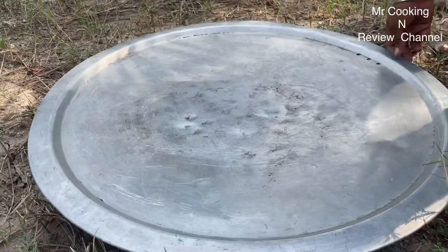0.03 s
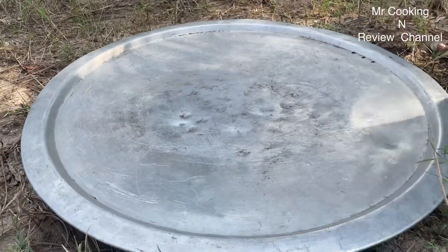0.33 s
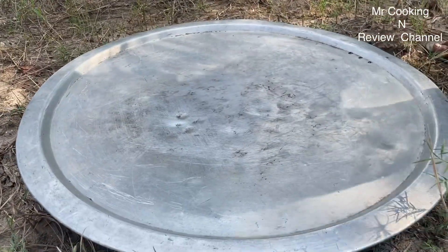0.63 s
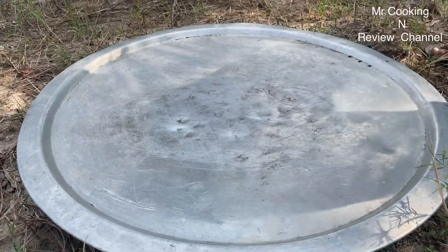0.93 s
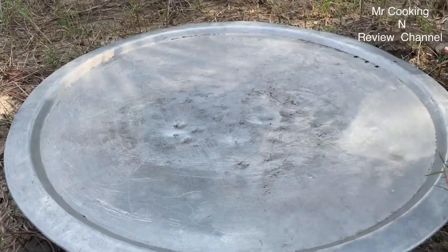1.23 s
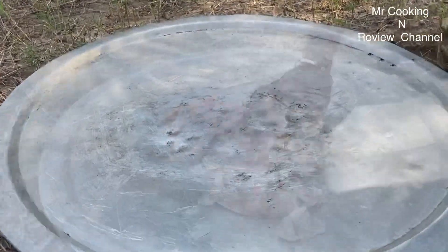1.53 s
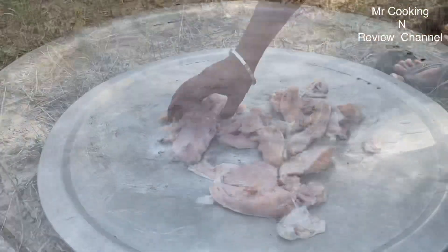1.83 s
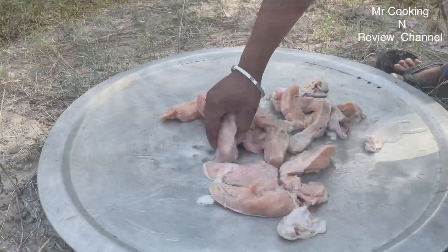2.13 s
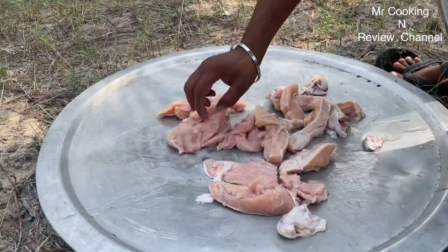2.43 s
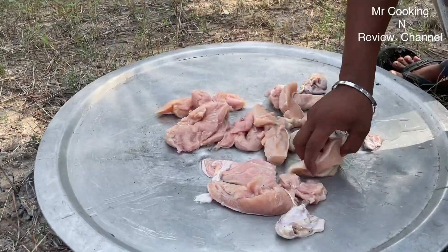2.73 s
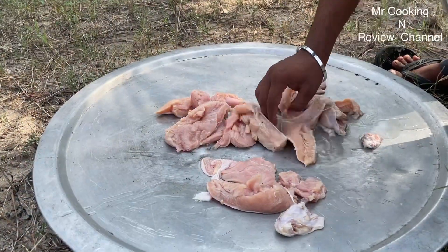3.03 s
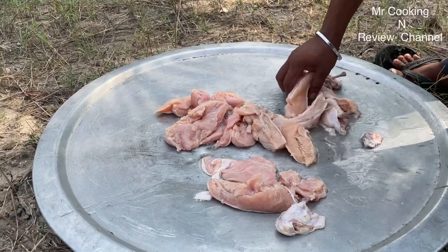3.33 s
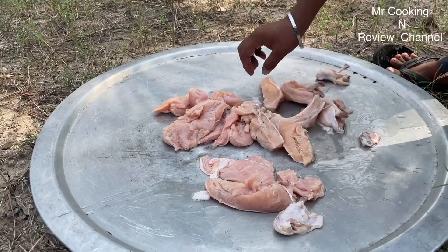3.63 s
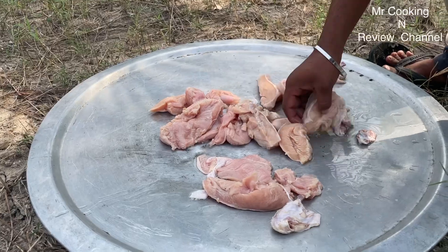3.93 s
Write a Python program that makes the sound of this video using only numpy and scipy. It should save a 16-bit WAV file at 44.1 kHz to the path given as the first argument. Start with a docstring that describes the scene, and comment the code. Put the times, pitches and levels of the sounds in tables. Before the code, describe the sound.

Wet meat handled and dropped on a metal tray, after a soft scrape and birdsong.

```python
"""Outdoors, a wide aluminium tray is let go on dry grass: its rim drags, stalks crack and the bare metal
rings while small birds whistle. Just before one second the scene changes to a hand sorting raw chicken on
the tray. The flesh squelches, wet films snap, air pockets pop, and pieces slap down on the damped metal,
hardest at 3.5 s. Last, sticky meat peels apart. Behind it are a soft rumble of air and one far bird."""
import sys
import numpy as np
from scipy import signal
from scipy.fft import rfft, irfft
from scipy.io import wavfile
from scipy.ndimage import uniform_filter1d

SR = 44100
rng = np.random.default_rng(int(sys.argv[2]) if len(sys.argv) > 2 else 0)


def store_pcm(level_fs):
    """Save levels as 16-bit WAV."""
    pcm = np.round(np.clip(level_fs, -1, 1) * 32767).astype(np.int16)
    wavfile.write(sys.argv[1], SR, np.atleast_2d(pcm).T)


N = 176400
T = np.arange(N) / SR
SCENE_CHANGE_S, SNAP_ATTACK_S = 0.981, 0.00058


def undb(db):
    """Decibels to gain."""
    return 10 ** (np.asarray(db) / 20)


def unit(x):
    """Scale to rms 1."""
    return x / np.sqrt(np.mean(x ** 2))


def fader(rows, column=1):
    """Gain over time from rows of time_s, level_db."""
    rows = np.array(rows)
    return undb(np.interp(T, rows[:, 0], rows[:, column]))


def eq(x, points, amount=1):
    """Filter by points of freq_hz, gain_db; amount scales the decibels."""
    points, size = np.array(points), 2 * x.shape[-1]
    hz = np.fft.rfftfreq(size, 1 / SR) + 1
    gain_db = np.interp(np.log(hz), np.log(points[:, 0]), points[:, 1])
    return irfft(rfft(x, size) * undb(amount * gain_db))[..., :size // 2]


def add(out, start_s, x):
    """Mix x into out at start_s."""
    i = max(int(start_s * SR), 0)
    out[i:i + len(x)] += x[:max(N - i, 0)]


def convolve(x, response):
    """Pass x through an impulse response."""
    return signal.fftconvolve(x, response)[:N]


def ring(modes):
    """Struck metal: each mode is a decaying sine."""
    t = T[:SR]
    return sum(undb(db) * np.sin(2 * np.pi * hz * t) * np.exp(-np.log(1000) * t / t60)
               for hz, db, t60 in modes)


def resonate(x, modes, ring_db):
    """A contact plus the ring it excites in the metal."""
    metal = ring(modes)
    return x + undb(ring_db) * convolve(x, metal / np.sqrt(np.sum(metal ** 2)))


def grains(per_s, spread_db):
    """Random ticks, uneven in size by spread_db."""
    sizes = undb(spread_db * np.minimum(rng.exponential(size=N), 4))
    return (rng.random(N) < per_s / SR) * sizes * rng.choice([-1, 1], N)


def burst(db, hz, decay_s, octaves, attack_s):
    """A short hit of noise in a bell around hz."""
    t = T[:SR // 4]
    off_centre = np.log2((np.fft.rfftfreq(len(t), 1 / SR) + 1) / hz) / octaves
    phases = np.exp(2j * np.pi * rng.random(len(off_centre)))
    noise = unit(irfft(phases / (1 + off_centre ** 2), len(t)))
    return undb(db) * noise * (1 - np.exp(-t / attack_s)) * np.exp(-t / decay_s)


def cracks(rows):
    """Small sharp cracks, each with its own colour."""
    out = np.zeros(N)
    for start, db, hz, decay in rows:
        add(out, start, burst(db + 3, hz, decay, octaves=0.58, attack_s=SNAP_ATTACK_S))
    return out


# Stereo width, narrow in the bass and open on top: freq_hz, side_db
WIDTH_EQ = [(60, -26), (280, -26), (500, -18), (900, -9), (1400, -3), (2400, -3), (4000, -4), (10000, 1.5)]
# Side signal that puts the left ahead in phase: freq_hz, side_db
PHASE_LEAD_EQ = [(150, -29), (400, -16), (800, -20), (1500, -32)]
def widen(x, scatter_s=0.003):
    """The left leads slightly; reflections off the tray make the treble differ between the sides."""
    t = T[:SR // 50]
    reflections = rng.standard_normal(len(t)) * np.exp(-t / scatter_s)
    allpass = irfft(np.exp(1j * np.angle(rfft(reflections))))
    side = eq(convolve(x, allpass), WIDTH_EQ) - eq(signal.hilbert(x).imag, PHASE_LEAD_EQ)
    return np.array([x + side, x - side])


# Swells of low air: time_s, level_db
RUMBLE_FADER = [(0, -60), (.25, -60), (.43, -65.5), (.6, -58), (.975, -60), (.99, -102), (1.15, -77),
                (1.35, -84.5), (1.5, -69.5), (1.9, -69.5), (2.1, -62.5), (2.35, -59), (2.52, -66.5),
                (2.85, -62.5), (3.1, -65.5), (3.5, -60), (4, -60)]
# Deep tone of the air: freq_hz, gain_db
RUMBLE_EQ = [(5, -52), (18, -21), (30, -12.5), (52, 1.5), (75, 2), (120, -10.5), (200, -21), (500, -38.5),
             (1500, -48)]
# Distant hiss of the field: time_s, level_db
HISS_FADER = [(0, -72), (.55, -66), (.975, -64.5), (.99, -112), (1.35, -92), (1.75, -90), (2.1, -85.5),
              (4, -67)]
# Tone of that hiss: freq_hz, gain_db
HISS_EQ = [(100, -20), (400, -3), (1000, -9), (2500, -1), (5500, 3), (7500, -14.5), (10000, -5),
           (16000, -10.5)]
def air():
    """The bed: low rumble and faint hiss of the open field."""
    rumble, rumble_side = (unit(eq(rng.standard_normal(N), RUMBLE_EQ)) * fader(RUMBLE_FADER)
                           for _ in range(2))
    hiss, hiss_side = (unit(eq(rng.standard_normal(N), HISS_EQ)) * fader(HISS_FADER) for _ in range(2))
    side = undb(-15.5) * rumble_side + eq(hiss_side, WIDTH_EQ)
    return rumble + hiss + np.array([side, -side])


# Bird notes: start_s, length_s, from_hz, to_hz, level_db, waver_hz
BIRD_NOTES = [(0.004, 0.064, 5360, 5460, -61, 250), (0.113, 0.068, 5760, 6390, -65.5, 352),
              (0.161, 0.054, 5130, 4820, -62.5, 293), (0.25, 0.032, 4660, 5620, -63, 308),
              (0.279, 0.045, 5980, 6700, -59, 288), (0.32, 0.088, 6700, 6260, -69, 304),
              (0.406, 0.079, 5790, 6930, -60.5, 303), (0.469, 0.036, 7050, 6420, -64, 300),
              (0.551, 0.08, 5240, 7220, -63, 352), (0.611, 0.056, 7210, 6370, -58.5, 300),
              (0.732, 0.044, 4810, 4996, -53, 120), (0.761, 0.051, 5440, 6920, -56.5, 246),
              (0.812, 0.054, 6640, 6560, -66.5, 146), (0.906, 0.017, 4820, 4880, -47.5, 80),
              (0.938, 0.044, 5130, 6920, -56, 300), (0.354, 0.053, 3230, 3580, -73.5, 89.5),
              (0.71, 0.03, 3130, 3600, -68, 90), (1.761, 0.077, 4940, 3900, -83.5, 203),
              (2.33, 0.054, 3560, 3660, -71, 139), (2.698, 0.044, 3227, 3470, -67.5, 142),
              (3.092, 0.067, 3080, 3700, -71.5, 171)]
def birds(direct_db=4.5, echo_db=9.5, echo_decay_s=0.055):
    """Gliding whistles, some buzzy, smeared by echoes from the trees."""
    calls = np.zeros(N)
    for start, length, from_hz, to_hz, db, waver_hz in BIRD_NOTES:
        progress = np.linspace(0, 1, int(length * SR))
        waver = unit(uniform_filter1d(rng.standard_normal(SR // 4), size=40))[:len(progress)]
        hz = from_hz + (to_hz - from_hz) * progress + waver_hz * waver
        swell = np.sqrt(np.abs(np.sin(np.pi * progress)))
        add(calls, start, undb(db) * swell * np.sin(2 * np.pi * np.cumsum(hz) / SR))
    trees = rng.standard_normal((2, N)) * np.exp(-T / echo_decay_s)
    echoes = np.array([convolve(calls, tail / np.sqrt(np.sum(tail ** 2))) for tail in trees])
    return undb(direct_db) * calls + undb(echo_db) * echoes


# Grass stirring close by: time_s, level_db
RUSTLE_FADER = [(.3, -75.5), (.70, -88), (.765, -52), (.81, -66), (.87, -74.5), (.925, -61.5), (.975, -55)]
# Crisp tone of straw: freq_hz, gain_db
STRAW_EQ = [(120, -19), (400, 0), (1300, -4.5), (2500, -3.5), (6000, -10.5), (11000, -7.5), (16000, -4.5)]
def rustle():
    """Fine crackle of dry grass."""
    return unit(eq(grains(per_s=1400, spread_db=5), STRAW_EQ)) * fader(RUSTLE_FADER)


# Rim scraping to rest: time_s, level_db
DRAG_FADER = [(0, -49.5), (.09, -51.5), (.14, -56.5), (.2, -64), (.33, -73), (.6, -81)]
# Dull tone of the scrape: freq_hz, gain_db
DRAG_EQ = [(80, -10), (170, 9.5), (300, 3.5), (600, -1), (1300, -2), (2500, -7), (5000, -13), (10000, -17),
           (16000, -22)]
# Rim damped by the grass: pitch_hz, level_db, t60_s
RIM_MODES = [(168, 6.5, 0.073), (297.2, -3.5, 0.4), (485, -6, 0.17), (610, 5, 0.18), (970, 3, 0.16),
             (1327, 5.5, 0.22), (1720, 11, 0.11)]
# Dry stalks breaking: start_s, level_db, centre_hz, decay_s
STALK_CRACKS = [(.081, -41, 8850, 0.0047), (.082, -49.5, 1510, 0.0044), (.095, -50.5, 3700, 0.018),
                (.470, -54, 2960, .004), (.738, -62.5, 1300, 0.01), (.767, -53, 1500, 0.0034),
                (.816, -41.5, 6330, 0.0021), (.917, -59, 685, 0.0066), (.935, -57.5, 695, 0.0049),
                (.970, -49.5, 3300, 0.0046)]
def rim_drag():
    """The rim drags over dry grass and rings faintly; stalks crack."""
    scrape = unit(eq(grains(per_s=1800, spread_db=0), DRAG_EQ)) * fader(DRAG_FADER)
    return resonate(scrape, RIM_MODES, ring_db=-14.5) + cracks(STALK_CRACKS)


# Open ring of the bare tray: pitch_hz, level_db, t60_s
EMPTY_TRAY_MODES = [(481.5, -14, 0.54), (672, -14, 0.44), (761.5, -4, 0.44), (791.5, -5, 0.46),
                    (970, -6, 0.11), (1100, -18, 0.43), (1430, -30, 0.6)]
# Knocks as it settles: start_s, level_db
TRAY_KNOCKS = [(.112, -39.5), (.137, -51)]
def empty_tray(attack_s=0.0093):
    """The tray settles in two soft knocks and the bare metal rings out."""
    out = np.zeros(N)
    note = ring(EMPTY_TRAY_MODES) * (1 - np.exp(-T[:SR] / attack_s))
    for start, db in TRAY_KNOCKS:
        add(out, start, undb(db) * note)
    return out


def pop(db, hz, decay_s, rise_per_s=5.1):
    """An air pocket rings briefly and rises a little in pitch."""
    t = T[:SR // 12]
    envelope = (1 - np.exp(-t / SNAP_ATTACK_S)) * np.exp(-t / decay_s)
    return undb(db) * envelope * np.sin(2 * np.pi * hz * t * (1 + rise_per_s * t / 2))


def grip(depth_db=0.96, surge_s=0.01):
    """The grip sticks and slips: a quick, uneven flutter in gain."""
    size = int(surge_s * SR)
    surges = uniform_filter1d(rng.standard_normal(N), size)
    return undb(depth_db * unit(uniform_filter1d(surges, size // 2)))


# The hand squeezing and sliding the meat: time_s, squelch_db, crackle_db
HAND_FADERS = [(1.0, -93, -91), (1.38, -88.5, -81.5), (1.49, -60, -71), (1.63, -76.5, -60.5),
               (1.72, -79, -85), (1.81, -83, -80.5), (1.85, -70, -62.5), (1.92, -65.5, -67.5),
               (2.02, -66.5, -67), (2.14, -61.5, -67.5), (2.21, -58.5, -57), (2.27, -60, -70.5),
               (2.36, -56.5, -66.5), (2.43, -73, -72), (2.55, -71, -75), (2.63, -54.5, -65),
               (2.72, -70.5, -68.5), (2.80, -60.5, -60), (2.92, -51, -63), (3.04, -76, -62),
               (3.11, -75, -69.5), (3.21, -72, -72.5), (3.26, -49.5, -56.5), (3.37, -62.5, -72),
               (3.46, -64.5, -67), (3.53, -39.5, -54), (3.58, -57, -68), (3.66, -58, -66.5),
               (3.74, -74, -67.5), (3.88, -63.5, -65), (4.0, -58, -94)]
# Low, fleshy body: freq_hz, gain_db
SQUELCH_EQ = [(100, 18), (200, 6), (400, 6), (800, -7.5), (1400, -2.5), (2200, -23), (4000, -17.5)]
# Wet top layer: freq_hz, gain_db
CRACKLE_EQ = [(900, -5), (1800, 1), (3200, -0.5), (4500, -3.5), (7000, -3), (10000, -9), (16000, -16.5)]
def squelch():
    """Dense soft pops of moist flesh, and finer crackle as it peels apart."""
    body = unit(eq(grains(per_s=1000, spread_db=1), SQUELCH_EQ) * grip())
    crackle = unit(eq(grains(per_s=2200, spread_db=1), CRACKLE_EQ) * grip())
    return body * fader(HAND_FADERS, column=1) + crackle * fader(HAND_FADERS, column=2)


def bubbles(count, centre_hz=2915, spread_oct=0.96, spread_db=4):
    """Stray pitched pops that ride the level of the wet crackle."""
    out, crackle_gain = np.zeros(N), fader(HAND_FADERS, column=2)
    for at, (pitch, size) in zip(rng.integers(0, N, count), rng.standard_normal((count, 2))):
        hz = centre_hz * 2 ** (spread_oct * pitch)
        add(out, at / SR, crackle_gain[at] * pop(3.5 + spread_db * size, hz, decay_s=0.0034))
    return out


# Sticky meat pulling apart: start_s, length_s, level_db
PEEL_SPRAYS = [(3.632, 0.056, -52), (3.692, 0.14, -55), (3.919, 0.07, -53)]
def peels(pops_each, centre_hz=3320, spread_oct=0.307, spread_db=3.5):
    """Strings of sticky film part one after another in a spray of pitched pops."""
    out = np.zeros(N)
    for start, length, db in PEEL_SPRAYS:
        for when, (pitch, size) in zip(rng.random(pops_each), rng.standard_normal((pops_each, 2))):
            hz = centre_hz * 2 ** (spread_oct * pitch)
            add(out, start + length * when, pop(db + spread_db * size, hz, decay_s=0.0028))
    return out


# Clear, pitched pops: start_s, level_db, pitch_hz, decay_s
POCKET_POPS = [(1.963, -46.5, 3900, 0.0017), (1.983, -54, 3620, .0015), (2.008, -60, 2100, 0.0039),
               (2.023, -39, 6050, .003), (2.135, -44, 4570, 0.0013), (2.589, -46, 3490, .003),
               (2.956, -47.5, 6400, 0.0024), (3.666, -46, 2950, 0.0062), (3.678, -46, 3650, 0.0068),
               (3.71, -56.5, 1565, 0.011), (3.760, -46, 2574, 0.0083), (3.760, -44.5, 3770, 0.0053),
               (3.847, -53.5, 1406, .006), (3.961, -37, 2550, 0.0066), (3.964, -38, 2850, 0.004),
               (3.975, -44, 4100, 0.004), (3.988, -54, 4100, 0.0046)]
def air_pockets():
    """Single larger air pockets open as the meat is lifted."""
    out = np.zeros(N)
    for start, db, hz, decay in POCKET_POPS:
        add(out, start, pop(db, hz, decay))
    return out


# Wet films breaking: start_s, level_db, centre_hz, decay_s
FILM_SNAPS = [(1.114, -54, 3890, 0.0048), (1.453, -65, 7200, 0.0056), (1.563, -59, 3050, 0.0068),
              (1.612, -48.5, 3500, 0.0021), (1.641, -50, 7600, 0.0022), (1.853, -55, 4370, 0.0036),
              (1.887, -58.5, 5660, 0.0059), (2.006, -54.5, 2320, 0.03), (2.02, -49, 4350, 0.004),
              (2.032, -44.5, 4800, 0.0045), (2.179, -49, 2980, 0.0044), (2.191, -52.5, 3860, 0.0081),
              (2.292, -53, 4270, 0.0088), (2.296, -46.5, 12000, 0.0021), (2.318, -42, 4360, 0.0031),
              (2.317, -55, 11300, 0.0013), (2.560, -47.5, 3630, 0.0024), (2.575, -52, 5000, .0015),
              (2.684, -52.5, 7670, 0.004), (2.759, -42, 2730, 0.0046), (2.845, -48, 5170, 0.0037),
              (2.902, -41, 8900, 0.0032), (3.018, -58, 4100, 0.003), (3.029, -54, 4000, 0.0035),
              (3.249, -54.5, 1895, 0.04), (3.2972, -45.5, 3630, 0.0043), (3.298, -49, 12400, 0.0011),
              (3.347, -56.5, 8640, 0.0024), (3.399, -47, 3460, 0.0016), (3.436, -48.5, 7360, 0.0045),
              (3.463, -43, 5540, 0.0012), (3.539, -50.5, 1680, 0.013), (3.586, -39, 4950, 0.0026),
              (3.615, -67, 8800, 0.002), (3.633, -51, 3650, 0.013), (3.668, -54.5, 4200, 0.0032),
              (3.758, -59, 3580, 0.0097), (3.918, -58.5, 3600, 0.011), (3.961, -45.5, 2220, 0.0085)]
def film_snaps(pocket_db=-6.5, spread_oct=0.26, max_delay_s=0.0056):
    """Each wet film cracks and frees three tiny air pockets that ring just after it."""
    out = cracks(FILM_SNAPS)
    for start, db, hz, decay in FILM_SNAPS:
        for pitch, delay in rng.random((3, 2)):
            pocket_hz = hz * 2 ** (spread_oct * (2 * pitch - 1))
            add(out, start + max_delay_s * delay, pop(db + pocket_db, pocket_hz, decay))
    return out


# Choked ring of the tray under meat: pitch_hz, level_db, t60_s
LOADED_TRAY_MODES = [(191, 4, 0.15), (251.5, 0.5, 0.076), (406, -2.5, 0.14), (532.4, 0, 0.12),
                     (629.6, 8, 0.078), (820, 0, 0.071), (1062, -2, 0.25), (1257, -8, 0.2),
                     (1430, -2.5, 0.18), (1720, 9, 0.076)]
# Meat landing: start_s, thud_db, thud_hz, splat_db, splat_hz, splat_decay_s
MEAT_SLAPS = [(1.055, -72, 303, -75.5, 800, 0.034), (1.114, -59.5, 221, -63.5, 720, 0.032),
              (1.561, -52, 1218, -59, 1240, 0.029), (1.610, -49, 658, -53, 756, 0.021),
              (1.942, -57.5, 1006, -60, 1100, 0.014), (1.975, -51, 1410, -60, 1420, 0.053),
              (2.061, -59, 360, -51, 1190, 0.0095), (2.103, -62, 1000, -58, 1200, 0.0092),
              (2.177, -47.5, 1467, -46.5, 1370, 0.023), (2.296, -48.5, 1143, -43.5, 1340, 0.0036),
              (2.319, -61, 1036, -48.5, 1380, 0.0057), (2.560, -45.5, 784, -58, 685, 0.0082),
              (2.565, -45, 691, -53, 584, 0.021), (2.612, -53.5, 374, -58, 1110, 0.034),
              (2.881, -45.5, 432, -44, 980, 0.011), (3.225, -51.5, 254, -50, 1180, 0.0084),
              (3.298, -56, 1040, -54, 1040, 0.028), (3.463, -50, 404, -38, 1190, 0.0029),
              (3.467, -38.5, 225, -48.5, 398, 0.03), (3.499, -31, 714, -43.5, 855, .008),
              (3.500, -39.5, 1007, -64, 900, 0.0042), (3.501, -31, 344, -53, 595, 0.0049),
              (3.508, -27.5, 411, -45, 450, 0.035), (3.510, -37.5, 200, -46, 400, 0.014),
              (3.526, -44, 507, -56, 900, 0.017), (3.587, -37, 1380, -35.5, 1230, 0.0075),
              (3.590, -32, 255, -45.5, 507, 0.016), (3.825, -55, 320, -65, 665, 0.02),
              (3.961, -78, 430, -51.5, 1190, 0.016)]
def slaps(thud_peak_s=0.0025, glide_depth=1.2, glide_s=0.00085):
    """Each landing flexes the tray in a falling thud, splats, and rings the damped metal."""
    out, t = np.zeros(N), T[:SR // 4]
    punch = t / thud_peak_s * np.exp(1 - t / thud_peak_s)
    for start, thud_db, thud_hz, splat_db, splat_hz, decay in MEAT_SLAPS:
        cycles = thud_hz * (t + glide_depth * glide_s * (1 - np.exp(-t / glide_s)))  # drops onto thud_hz
        add(out, start, undb(thud_db) * punch * np.sin(2 * np.pi * cycles))
        add(out, start, burst(splat_db, splat_hz, decay, octaves=0.99, attack_s=0.0011))
    return resonate(out, LOADED_TRAY_MODES, ring_db=-14)


def sheen(x, mode_count, t60_s=0.083):
    """Dense upper modes of the sheet give every contact a faint metallic colour."""
    pitches = np.geomspace(900, 6000, mode_count) * (1 + 0.008 * rng.standard_normal(mode_count))
    return resonate(x, [(hz, 0, t60_s) for hz in pitches], ring_db=-13.5)


# A thin sheet radiates little bass: freq_hz, gain_db
SHEET_LOW_CUT = [(40, -48), (110, -16), (165, -1), (300, -1)]
# Pan of the close sounds: freq_hz, left_minus_right_db
PAN_EQ = [(60, 21), (200, -1.5), (400, 3), (700, 0.5), (1300, 11.5), (2400, -0.5), (4400, 2.5),
          (8000, -0.5)]
def scene():
    """The empty tray, then the meat, both a little to the left, over birds and air."""
    meat = slaps() + film_snaps() + air_pockets() + squelch() + bubbles(count=220) + peels(pops_each=26)
    meat_on_tray = sheen(meat, mode_count=56)
    first_scene = T < SCENE_CHANGE_S
    tray_on_grass = (empty_tray() + rim_drag() + rustle()) * first_scene
    left, right = widen(eq(tray_on_grass + meat_on_tray, SHEET_LOW_CUT))
    foreground = np.array([eq(left, PAN_EQ, amount=0.5), eq(right, PAN_EQ, amount=-0.5)])
    bird_gate = first_scene | (T > SCENE_CHANGE_S + 0.5)  # the birds fall silent for half a second after the scene changes
    return foreground + birds() * bird_gate + air()


# Tone of the whole mix: freq_hz, gain_db
MASTER_EQ = [(20, 0.5), (7200, -2), (7900, -20), (8500, -22), (9100, -4), (13200, -2.5), (14300, -17),
             (16000, -26.5)]
def record(dry):
    """A dip near 8 kHz, a dull top and a steep cut-off at 16 kHz."""
    high_cut = signal.ellip(8, 0.2, 70, 16000, fs=SR, output="sos")
    return signal.sosfilt(high_cut, eq(dry, MASTER_EQ))


dry = scene()
out = record(dry)
store_pcm(out)
```